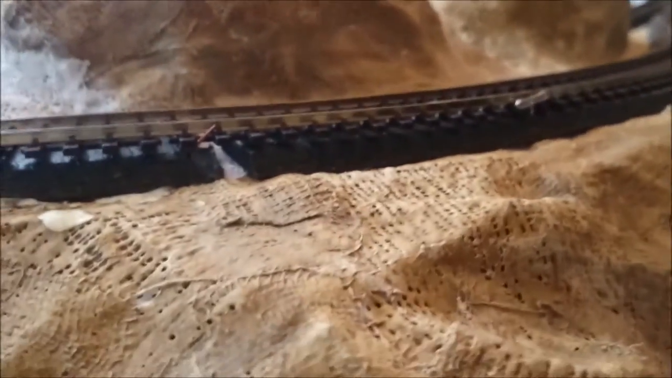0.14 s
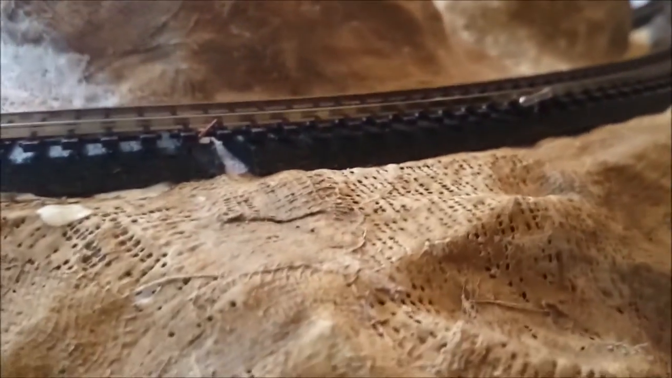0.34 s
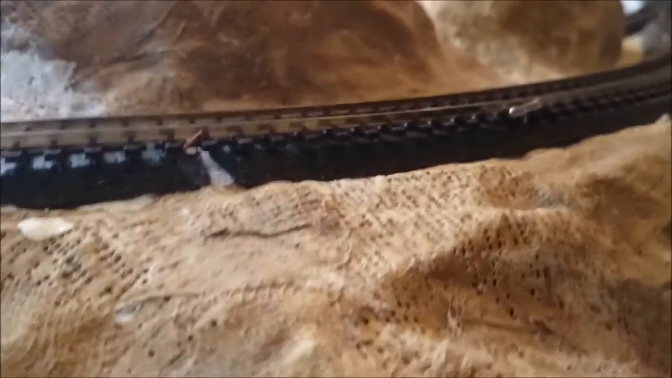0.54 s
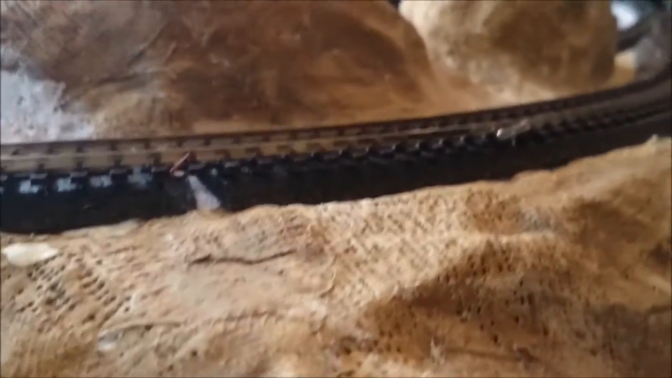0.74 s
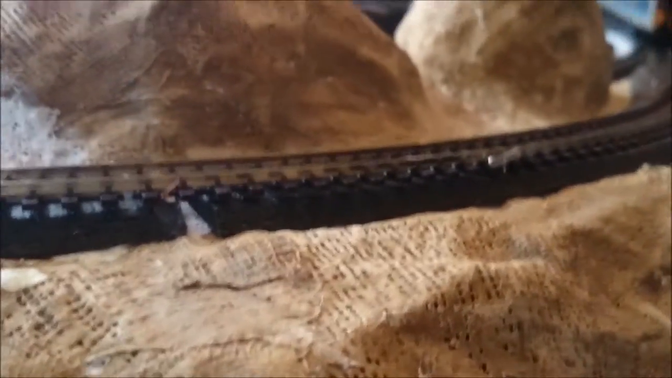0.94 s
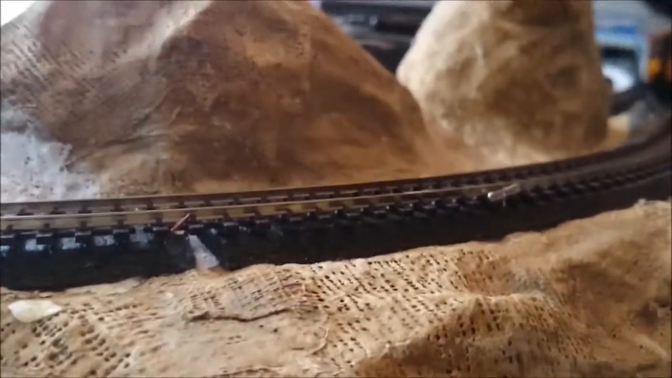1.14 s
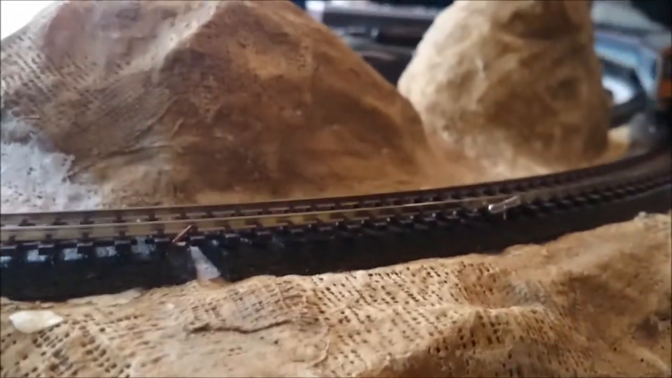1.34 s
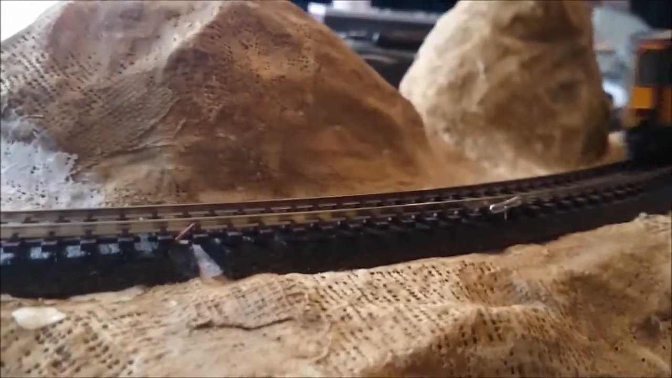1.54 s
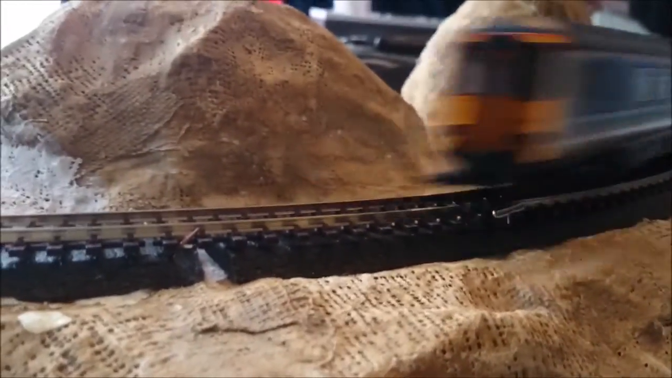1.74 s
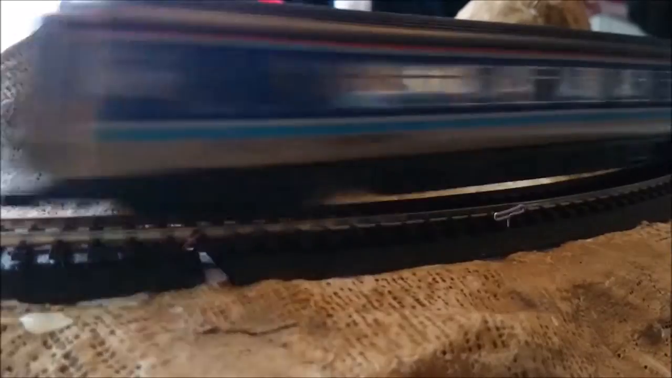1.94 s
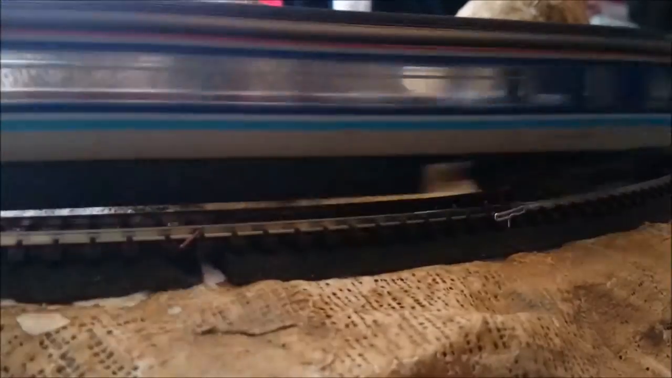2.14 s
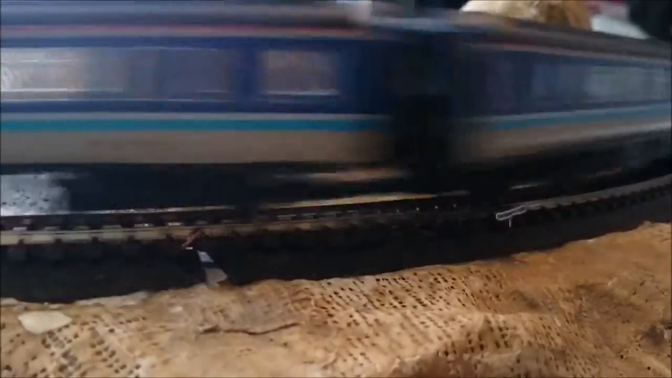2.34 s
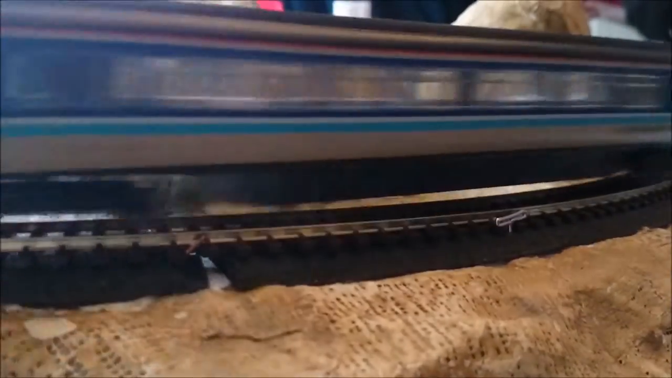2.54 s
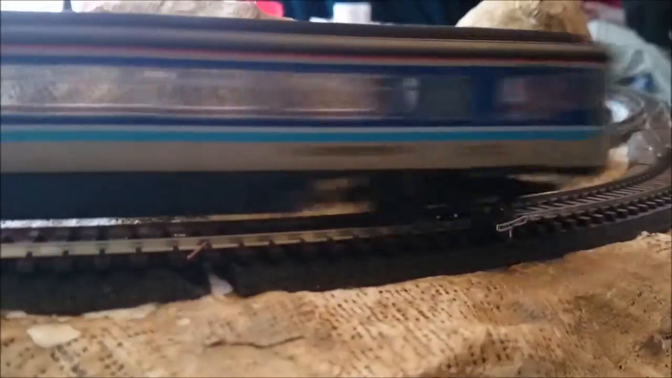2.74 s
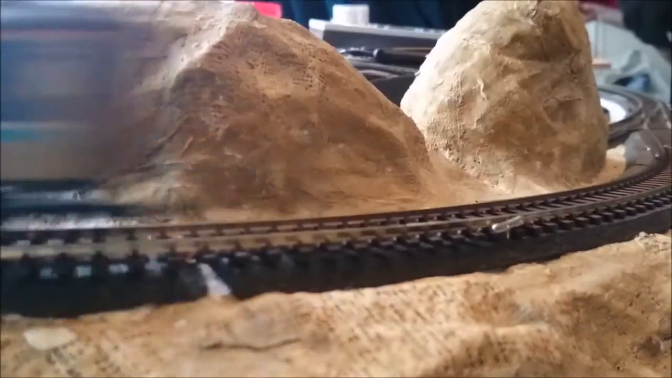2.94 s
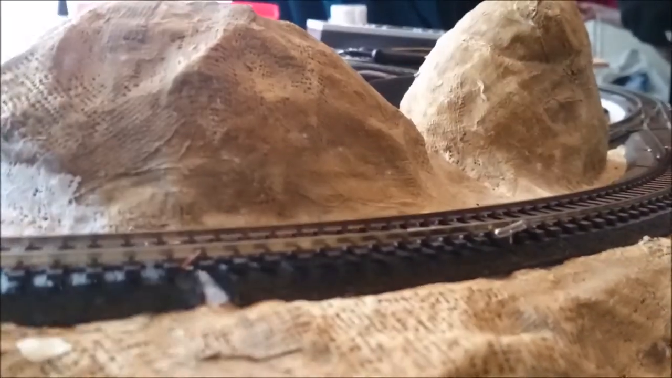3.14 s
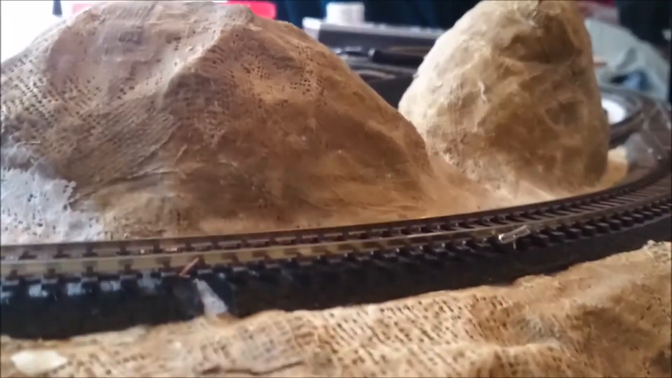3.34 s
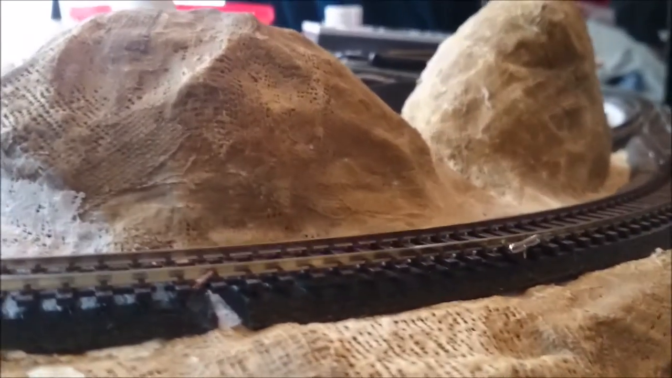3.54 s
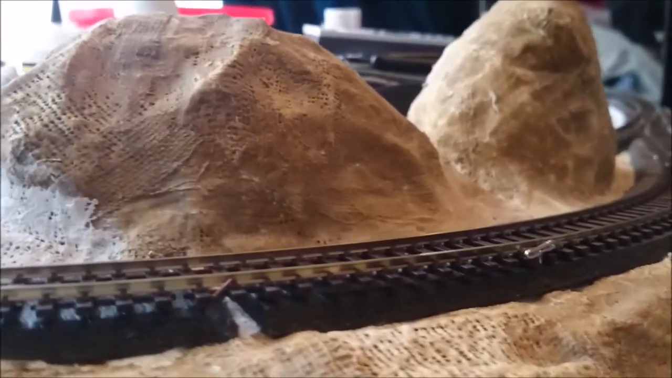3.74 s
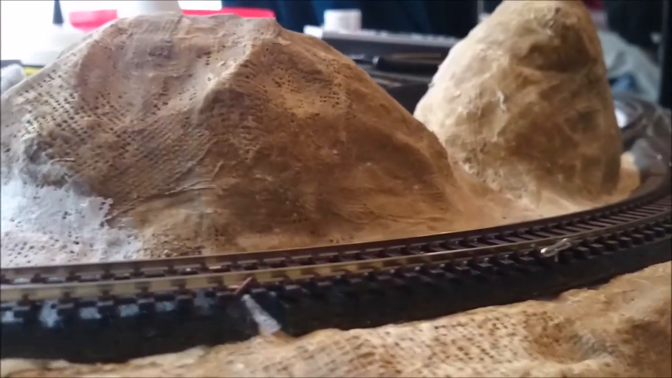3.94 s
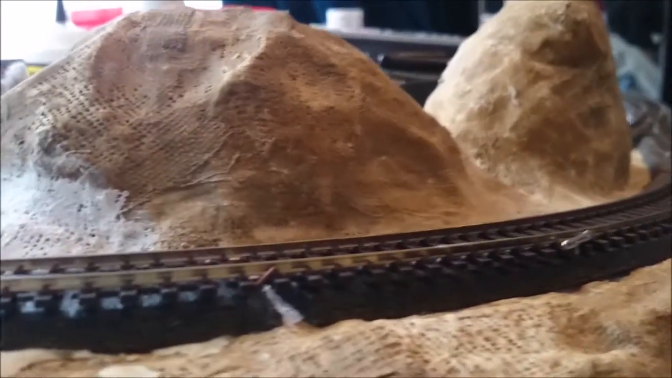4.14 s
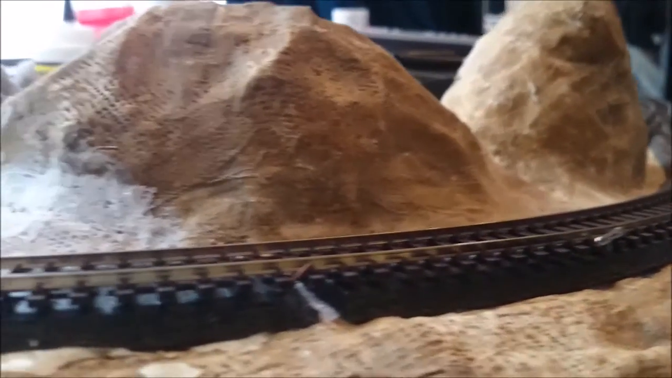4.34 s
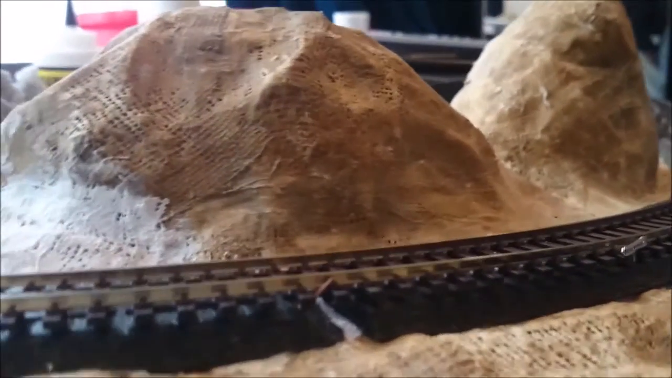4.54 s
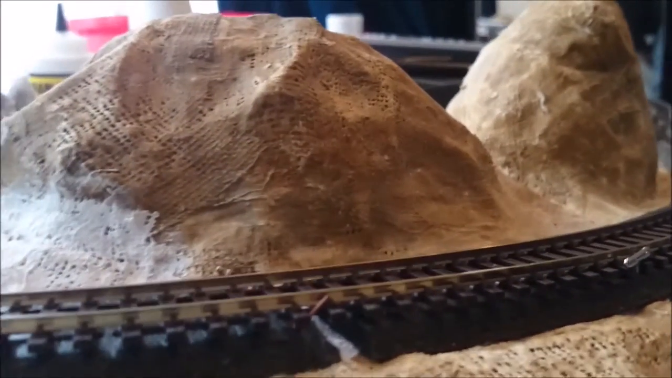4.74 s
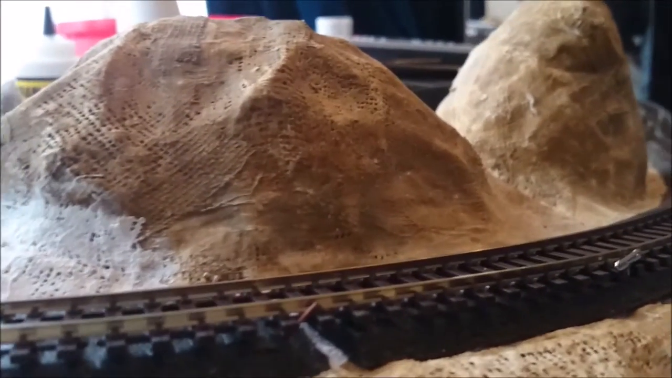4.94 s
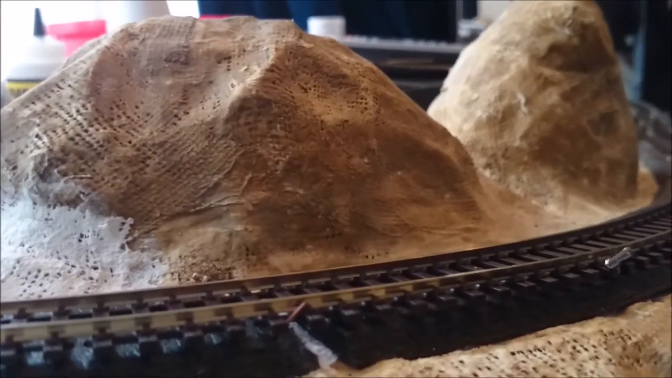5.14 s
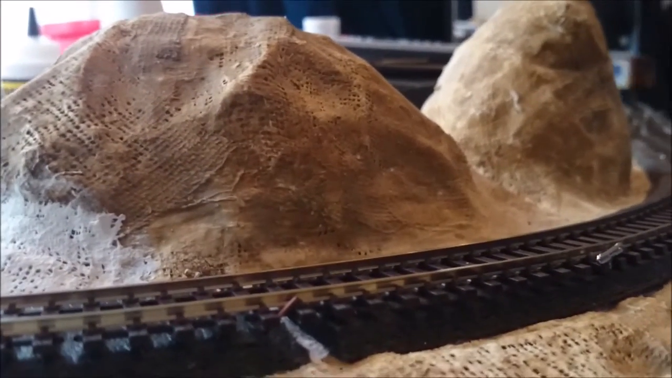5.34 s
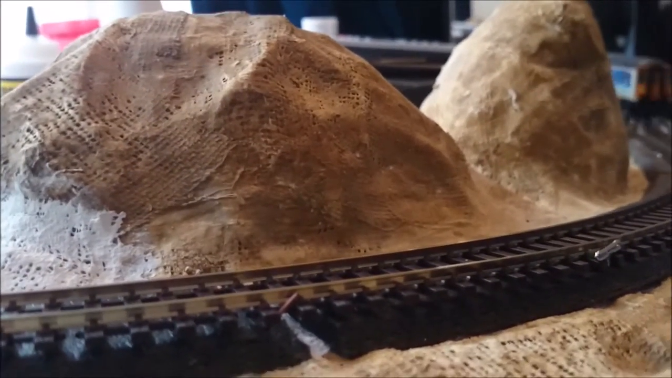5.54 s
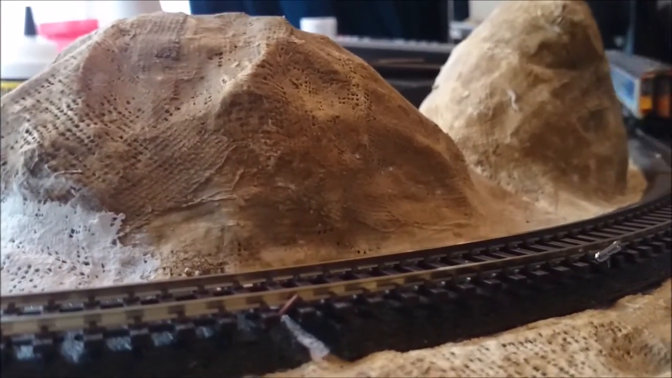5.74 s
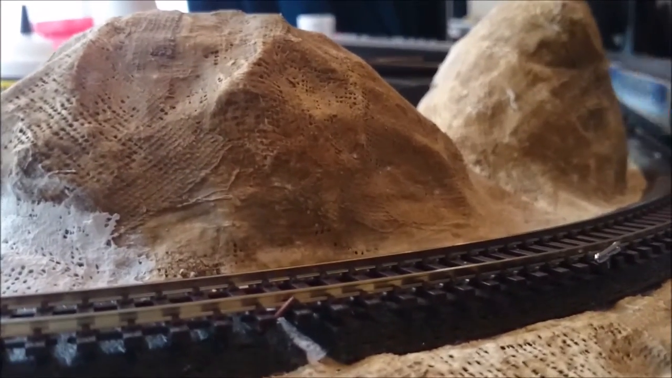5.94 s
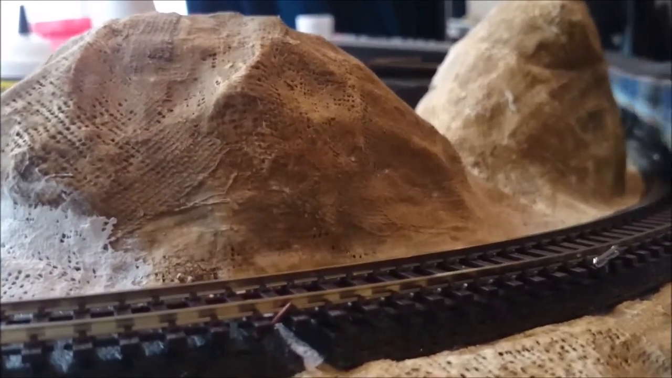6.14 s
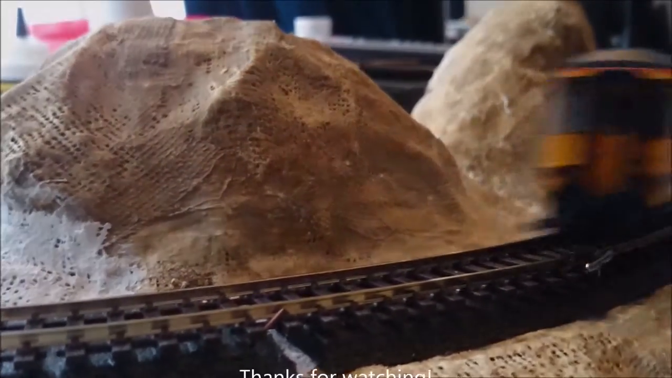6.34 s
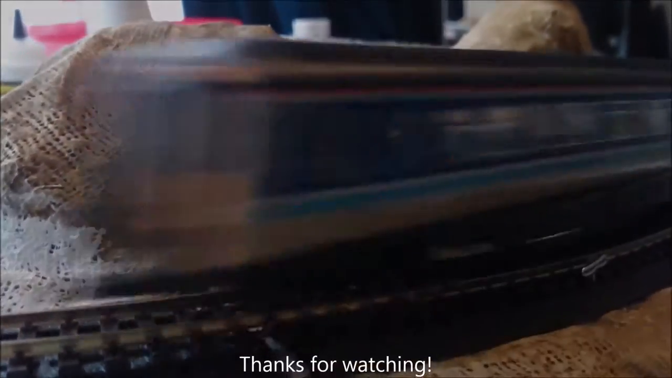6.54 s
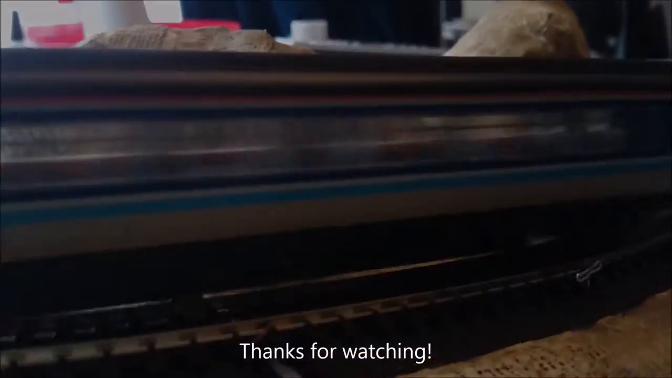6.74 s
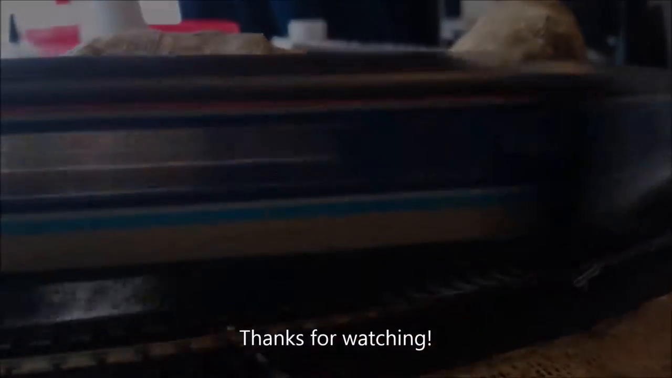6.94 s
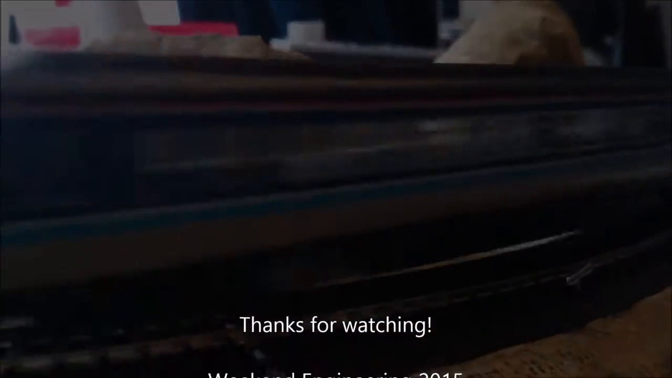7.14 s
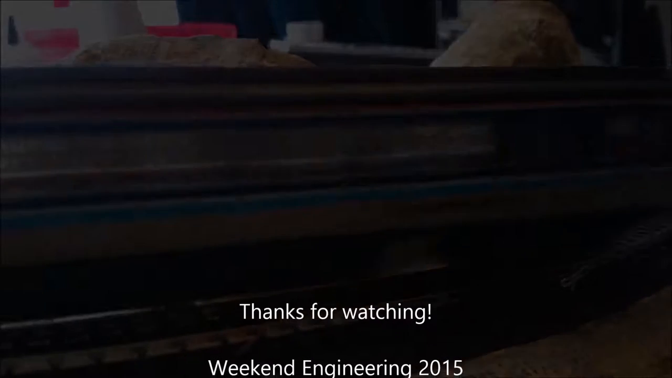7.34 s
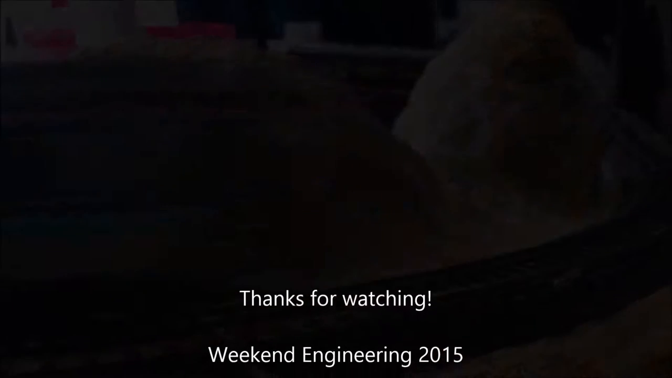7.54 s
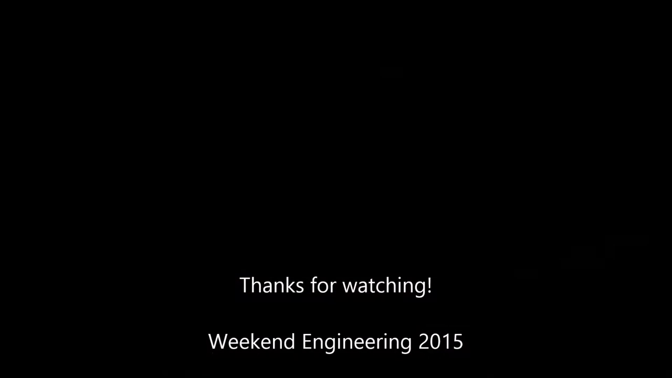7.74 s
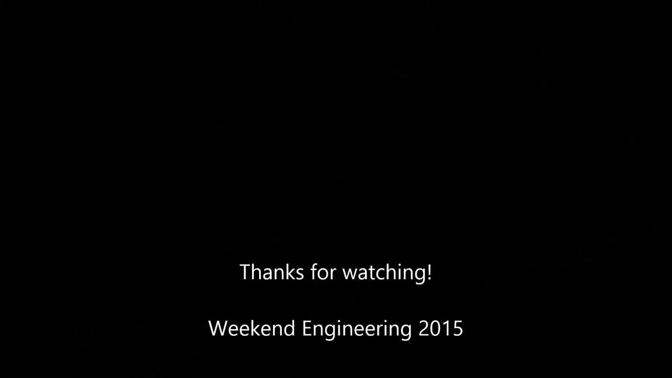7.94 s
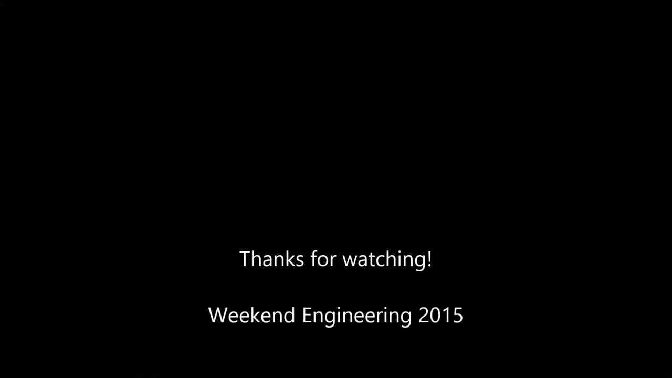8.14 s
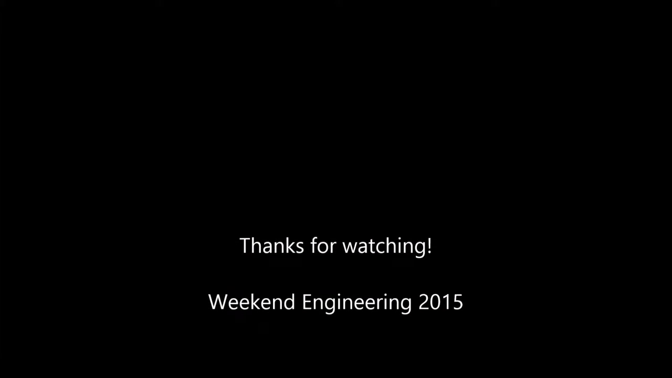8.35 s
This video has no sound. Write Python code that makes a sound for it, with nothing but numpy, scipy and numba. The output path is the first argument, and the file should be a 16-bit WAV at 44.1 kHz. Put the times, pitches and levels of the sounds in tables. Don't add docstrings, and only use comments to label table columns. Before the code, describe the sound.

Tiny motor whine and gritty wheel noise swell, fade and swell again as a toy train laps its track, ending in an abrupt click and silence.

```python
import sys
import numpy as np
from scipy import signal
from scipy.fft import dct
from scipy.io import wavfile
from scipy.ndimage import uniform_filter1d
from numba import njit

SR = 44100
rng = np.random.default_rng(int(sys.argv[2]) if len(sys.argv) > 2 else 0)


def store_wav(level_fs):
    pcm = np.round(np.clip(np.atleast_2d(level_fs), -1, 1) * 32767)
    wavfile.write(sys.argv[1], SR, pcm.T.astype(np.int16))


def volts(x):
    e = np.asarray(x, float) / 20
    return 10 ** e


N = 369545

# t/s, shaft f/Hz, twice-a-turn hum level/dB, pole tone level/dB
MOTOR_LAP = [(.13, 74.3, -77, -55), (.45, 73.5, -65, -54.5), (.85, 71.5, -72.5, -57.5),
             (1.05, 72, -66, -54), (1.4, 67.8, -67.5, -69), (1.55, 61.5, -73.5, -67.5),
             (1.75, 57, -64, -50.5), (1.96, 60.5, -78.5, -46), (2.08, 61, -59.5, -48.5),
             (2.3, 59.5, -72, -53.5), (2.6, 61, -69.5, -54), (2.9, 62.2, -70, -59.5),
             (3.08, 66, -59.5, -48), (3.33, 64.5, -62, -59.5), (3.58, 70.3, -50, -49.5),
             (3.98, 71, -64, -61.5), (4.12, 72.5, -55, -53), (4.4, 72.5, -73, -58.5)]
# t/s, level/dB, shell resonance f/Hz, left minus right/dB
WHIRR_LAP = [(0., -52, 5100, 4.5), (.6, -42.5, 4900, 8.5),(.95, -45, 5150, 5), (1.28, -38, 4970, 9.5),
             (1.58, -39.5, 5150, 5), (1.73, -31.5, 4860, 12), (1.88, -26.5, 4730, 17.5),
             (2.01, -26.5, 5050, 16), (2.14, -23.5, 5050, 20.5), (2.32, -35, 5120, 15.5),
             (2.66, -32.5, 5180, 22), (2.78, -38, 4730, 19), (2.95, -37.5, 5100, 18.5),
             (3.2, -36.5, 4950, 15), (3.6, -43.5, 5070, 21.5), (3.75, -38, 5200, 14),
             (3.95, -49.5, 5000, 8.5), (4.15, -44, 5000, 13)]
# t/s, board roar level/dB, nearness in clear view/dB
WHEELS_LAP = [(.3, -46.5, -22.5), (.95, -47, -23.5), (1.25, -43, -18), (1.5, -44.5, -14), (1.62, -42, -6),
              (1.86, -44.5, -6), (2.1, -39, -1), (2.3, -41.5, -6), (2.58, -40, -8.5), (2.7, -42.5, -5.5),
              (2.92, -38, -15), (3.13, -42, -11), (3.3, -40.5, -11.5), (3.55, -41, -14.5),
              (3.78, -39.5, -14.5), (3.92, -43, -23), (4.3, -43.5, -27.5), (4.55, -44, -24.5)]
# f/Hz, level per Hz/dB
ROAR_COLOUR = [(12, -24), (20, -5), (38, -22.5), (70, -35.5), (140, -18), (175, -29), (306, -7), (491, -10),
               (614, -6), (1300, -7.5), (3450, -9.5), (5090, -2), (8880, -34.5), (13100, -34.5),
               (15500, -47.5)]
# f/Hz, width/Hz, level/dB
BOARD_RINGS = [
    (345, 94, -5),
    (614, 70, 7),
]
# f/Hz, left minus right/dB
PORT_BALANCE = [(60, 0), (110, 3.5), (200, 2), (380, 6), (700, 11.5), (1290, 5), (2380, 9.5), (4400, 11),
                (8120, 0), (15000, 4)]
# f/Hz, likeness/0-1
PORT_LIKENESS = [(20, .4), (60, 0.7), (130, 0.3), (290, 0.87), (640, 0.78), (1410, 0.29), (3100, 0.22),
                 (6820, .15), (15000, .1)]
# f/Hz, share/0-1
BOARD_SHARE = [(60, 0.09), (200, 0.97), (15000, 0.75)]
RING_SHARE = [(1000, 0.), (1500, 0.55), (5000, 1.), (7500, 0.024)]
HISS_SHARE = [(5000, 0.049), (7500, 0.99)]
# t/s, peak level/dB
RAIL_JOINTS = [(.1505, -50), (.530, -50), (.708, -39), (1.062, -36), (1.120, -48.5), (1.211, -42),
               (1.279, -34), (1.312, -43), (1.413, -34), (1.440, -40), (1.542, -39), (1.578, -32),
               (1.616, -29.5), (1.659, -28.5), (1.765, -28.5), (1.85, -30), (2.055, -27.5), (2.161, -29),
               (2.548, -30.5), (2.792, -36), (3.243, -24.5), (3.293, -30), (3.388, -30.5), (3.443, -29),
               (3.654, -36), (3.698, -28), (4.026, -43), (4.468, -48), (4.513, -48)]
# t/s, length/s, f/Hz, width/Hz, level/dB
RINGING_STRETCHES = [(.35, 0.56, 3000, 349, 4.5), (.35, 0.26, 2400, 248.6, -10),
                     (0.698, 0.74, 1040, 120, 7), (.8, 1, 557, 60, 7.5), (1.494, 0.076, 604, 70, 11.5),
                     (1.507, 0.11, 2400, 200, 8), (1.65, 0.29, 428, 100, 9), (1.82, 0.092, 2030, 200.5, 10),
                     (2.142, 0.22, 660, 90, 7.5), (2.55, 0.1, 593, 60, 11), (2.523, 0.16, 950, 90, 13.5),
                     (2.95, 0.17, 1040, 90, 8), (3.05, 0.12, 1700, 149.4, 5), (3.201, 0.24, 1940, 200, 8),
                     (3.6, 1, 675, 130.4, 7), (4.199, 0.31, 650, 89.8, 3), (4.3, .3, 963, 100.4, 10)]
# t/s, length/s, f/Hz, width/Hz, level/dB
TREBLE_STRETCHES = [(1.2, 0.67, 6380, 400, 4), (1.248, 0.3, 4630, 250, 6), (1.25, 0.33, 5420, 300, 4),
                    (1.304, 0.52, 5790, 249.5, -4.5), (1.8, 0.12, 4150, 399, -4.5),
                    (1.8, 0.39, 4410, 301, 6), (2.0, 0.071, 6100, 400, 2.5), (2.151, 0.18, 7230, 603, 2.5),
                    (2.6, .15, 6500, 900, 0.5), (2.7, 0.38, 4150, 401, 5.5), (3.597, 0.53, 5740, 500, 2.5),
                    (4.3, 0.53, 5840, 400, 4.5), (0.498, 0.96, 3680, 403.4, -3)]
# t/s, length/s, level over the tremble/dB
HAND_SHIFTS = [
    (.45, .2, 9),
    (7.5, 0.29, 5),
]
# f/Hz, level/dB
FAINTEST_STEP = [(7000, -68), (8500, -54), (9500, -49.5), (11000, -51.5), (13000, -55), (14500, -60),
                 (15500, -53)]
# f/Hz, level/dB
LOCAL_STEP = [(5000, -18), (7000, -9), (9000, 4), (12000, 6), (15500, 9.5)]

POLES, LAP_S = 5, 4.635
FRAME, BLOCK = 1024, 1024
CLOSER_DB_PER_LAP = 0.86
RING_SLACK, RING_NEAR = 0.66, .15
HISS_SLACK, WHEEL_PAN_DB = 0.65, 0.06
JOINT_SCATTER_DB, THUD_DB, JOINT_PAN_SHARE = 1, 8, .6
LAG_MS, LEAD_MS, FROM_RIGHT_S, FROM_RIGHT_FOR_S, TURN_S = 0.35, 0.12, 0.96, 1, 0.076
HAND_DB, TREMBLE_DB = -71, 2
SHOVE_S, SHOVE_LENGTH_S, SHOVE_HZ, SHOVE_DB, SHOVE_LEFT = 7.6, .19, 4.9, -32.5, .1
CUT_S, CUT_TAIL_DB, FIZZ_S, FIZZ_DB = 7.7838, -36, .0055, -41


def track(table):
    s, *columns = np.transpose(table)
    return [np.interp(np.arange(N) / SR, s, c, period=LAP_S) for c in columns]


def across(table, hz):
    f, value = np.transpose(table)[:2]
    return np.interp(np.log(hz + 1), np.log(f), value)


def unit(x):
    return x / np.sqrt(np.mean(x ** 2))


def pan(x, db):
    return x * volts(np.array([db, -db]).reshape(2, -1) / 2)


def walk(rate):
    k = int(SR / rate)
    held = np.repeat(rng.standard_normal(N // k + 1), k)
    return unit(uniform_filter1d(uniform_filter1d(held, k), k)[:N])


def grit(rate, spread_db):
    return unit(rng.standard_normal(N) * volts(spread_db * walk(rate)))


@njit
def moving_resonance(x, hz, width):
    y, band, low = np.empty(len(x)), 0., 0.
    for i in range(len(x)):
        g, k = np.tan(np.pi * hz[i] / SR), width / hz[i]
        v = (band + g * (x[i] - low)) / (1 + g * (g + k))
        band, low, y[i] = 2 * v - band, low + 2 * g * v, k * v
    return y


def later(x):
    into = np.arange(N) / SR % LAP_S - FROM_RIGHT_S
    right = (np.tanh(into / TURN_S) - np.tanh((into - FROM_RIGHT_FOR_S) / TURN_S)) / 2
    lag_ms = LAG_MS - (LAG_MS + LEAD_MS) * right
    return np.interp(np.arange(N) - lag_ms * SR / 1000, np.arange(N), x)


def motor():
    shaft_hz, hum_db, pole_db = track(MOTOR_LAP)
    whirr_db, shell_hz, pan_db = track(WHIRR_LAP)
    whirr_db = whirr_db + .8 * walk(14)
    shell_hz = shell_hz * (1 + .008 * walk(12))
    hum_db = hum_db + 1.7 * walk(7.1)
    pole_db = pole_db + 1.2 * walk(9)
    turn = 2 * np.pi * np.cumsum(shaft_hz * (1 + .004 * walk(30))) / SR
    hum = volts(hum_db + 0.5 + 0.73 * walk(11)) * np.sin(2 * turn)
    pole_tone = volts(pole_db + 4.0 + 2.8 * walk(30)) * np.sin(POLES * turn + 0.7 * walk(60))
    tones = hum + pole_tone
    gate = volts(2.3 * np.cos(POLES * turn) + 1.1 * np.cos(2 * turn) + 0.12 * np.cos(turn))
    far_db = 0.59 * (whirr_db.max() - whirr_db)
    shell = []
    for hz, width_hz, skirt_db in ((shell_hz, 750., -7), (1.184 * shell_hz, 1300., -3)):
        mesh = gate * grit(450, 1.5)
        narrow = moving_resonance(moving_resonance(mesh, hz, width_hz), hz, 1.28 * width_hz)
        skirt = moving_resonance(moving_resonance(mesh, 1.1 * hz, 2300.), 0.99 * hz, 2100.0)
        spread = volts(skirt_db + far_db)
        shell.append((unit(narrow) + spread * unit(skirt)) / (1 + spread))
    lift_db = 6.02 - 10 * np.log10(volts(pan_db) + volts(-pan_db))
    whirr = pan(np.array(shell) * volts(whirr_db + lift_db - 1.15), pan_db)
    return pan(np.array([tones, later(tones)]), 2.3), whirr


def wheels():
    roar_db, near_db = (c - c.mean() for c in track(WHEELS_LAP))
    ring_db = RING_NEAR * near_db - RING_SLACK * roar_db
    hiss_db = near_db - HISS_SLACK * roar_db
    pan_db = WHEEL_PAN_DB * near_db
    rough = volts(0.7 * walk(14) + 0.84 * walk(60))
    shared = grit(200, 1.5)
    rolling = rough * np.array([shared, later(shared), grit(200, 1.2), grit(200, 1.0)])
    hz, s, z = signal.stft(rolling, SR, nperseg=FRAME)
    at = np.minimum((s * SR).astype(int), N - 1)
    alike = np.clip(across(PORT_LIKENESS, hz), 0, 1)[:, None]
    z = np.sqrt(alike) * z[:2] + np.sqrt(1 - alike) * z[2:]
    rings = sum(db / (1 + (2 * (hz - f) / w) ** 2) for f, w, db in BOARD_RINGS)
    board = across(BOARD_SHARE, hz)[:, None]
    mid = across(RING_SHARE, hz)[:, None]
    top = across(HISS_SHARE, hz)[:, None]
    dip = -6.0 / (1 + ((hz - 5000) / 1100) ** 2)
    db = (across(ROAR_COLOUR, hz) + 0.38 * rings + dip)[:, None]
    db = db + board * roar_db[at] + mid * ring_db[at] + top * hiss_db[at]
    side = across(PORT_BALANCE, hz)[:, None] + board * (1 - .6 * top) * pan_db[at]
    db = db - 10 * np.log10(volts(side) + volts(-side)) + np.array([side, -side]) / 2
    roar = signal.istft(z * volts(db), SR, nperseg=FRAME)[1][:, :N]
    return unit(roar) * volts(-35.5)


def hand():
    t = np.arange(N) / SR
    low = signal.butter(3, 22, fs=SR, output="sos")
    push = signal.sosfilt(low, rng.standard_normal((2, N)))
    shifts_db = sum(d * np.exp(-((t - s) / w) ** 2) for s, w, d in HAND_SHIFTS)
    db = HAND_DB + TREMBLE_DB * walk(6.6) + shifts_db
    swell = np.exp(-((t - SHOVE_S) / SHOVE_LENGTH_S) ** 2)
    shove = volts(SHOVE_DB) * swell * np.sin(2 * np.pi * SHOVE_HZ * (t - SHOVE_S))
    return pan(unit(0.602 * push[0] + push) * volts(db + 4.5), -8.5) + shove * np.array([[SHOVE_LEFT], [1]])


def joints():
    t = np.arange(1764) / SR
    out = np.zeros((2, N + int(LAP_S * SR)))
    bright = signal.butter(2, [2500, 10000], "bandpass", fs=SR, output="sos")
    dull = signal.butter(2, [450, 1100], "bandpass", fs=SR, output="sos")
    roar_db = track(WHEELS_LAP)[0]
    pan_db = JOINT_PAN_SHARE * (track(WHIRR_LAP)[2] - 7)
    for lap in range(2):
        noise = rng.standard_normal((len(RAIL_JOINTS), 2, len(t)))
        for (s, peak_db), burst in zip(RAIL_JOINTS, noise):
            i = int((s + lap * LAP_S) * SR)
            at = min(i, N - 1)
            peak_db = peak_db + JOINT_SCATTER_DB * burst[0, 0]
            burst = burst * (1 - np.exp(-t / 0.0017)) * np.exp(-t / 0.01)
            rattle = signal.sosfilt(bright, burst) * volts(peak_db - 6.5)
            thud = signal.sosfilt(dull, burst) * volts(roar_db[at] + THUD_DB)
            out[:, i:i + len(t)] += pan(rattle + thud, pan_db[at])
    return out[:, :N]


def oval(x):
    hz, s, z = signal.stft(x, SR, nperseg=FRAME)
    db = 0
    for start, length, f, w, peak_db in RINGING_STRETCHES + TREBLE_STRETCHES:
        away = (s - start + LAP_S / 2) % LAP_S - LAP_S / 2
        resonance = 1 / (1 + (2 * (hz - f) / w) ** 2)
        db = db + peak_db * np.outer(resonance, np.exp(-(away / length) ** 2))
    patch = rng.standard_normal(z.shape)
    for _ in range(2):
        patch = uniform_filter1d(uniform_filter1d(patch, size=14, axis=2), size=4, axis=1)
    return signal.istft(z * volts(db + 1.4 * unit(patch)), SR, nperseg=FRAME)[1][:, :N]


def thin(x):
    half = BLOCK // 2
    window = np.sin(np.pi * (np.arange(2 * BLOCK) + .5) / (2 * BLOCK))
    mid_side = np.array([[1, 0.99], [1, -0.98]]) / np.sqrt(2)
    blocks = np.pad(mid_side @ x, ((0, 0), (BLOCK, 2 * BLOCK - N % BLOCK))).reshape(2, -1, BLOCK)
    pairs = np.concatenate([blocks[:, :-1], blocks[:, 1:]], axis=2) * window
    a, b, c, d = np.split(pairs, 4, axis=2)
    folded = np.concatenate([-c[..., ::-1] - d, a - b[..., ::-1]], axis=2)
    lines = dct(folded, type=4, norm="ortho")
    hz = np.arange(BLOCK) * SR / 2 / BLOCK
    local = np.sqrt(uniform_filter1d(lines ** 2, size=24, axis=2) + 1e-14)
    waver_db = np.repeat(2.5 * rng.standard_normal((2, len(lines[0]), BLOCK // 16)), 16, axis=2)
    smallest = volts(across(FAINTEST_STEP, hz) + waver_db)
    step = np.maximum(local * volts(across(LOCAL_STEP, hz)), smallest)
    u = dct(np.round(lines / step) * step, type=4, norm="ortho")
    out = np.concatenate([u[..., half:], -u[..., ::-1], -u[..., :half]], axis=2) * window
    return mid_side @ (out[:, :-1, BLOCK:] + out[:, 1:, :BLOCK]).reshape(2, -1)[:, :N]


def scene():
    tones, whirr = motor()
    closer = volts(CLOSER_DB_PER_LAP * (np.arange(N) / SR / LAP_S - 1.27))
    return closer * (tones + oval(whirr + wheels()) + joints()) + hand()


def band_limit(x):
    return signal.sosfilt(signal.butter(12, 15750, fs=SR, output="sos"), x)


def record(dry):
    after = np.maximum(np.arange(N) / SR - CUT_S, 0)
    tail = volts(CUT_TAIL_DB - 1000 * after) * (after < .028)
    cut = thin(dry) * np.where(after > 0, tail, 1)
    fizz = volts(FIZZ_DB) * rng.standard_normal(cut.shape) * (after > 0) * (after < FIZZ_S)
    cut = cut + fizz * np.array([[.3], [1]])
    cut[:, int(CUT_S * SR)] += volts(np.array([-32, -18]))
    return band_limit(cut)


dry = scene()
out = record(dry)
store_wav(out)
```